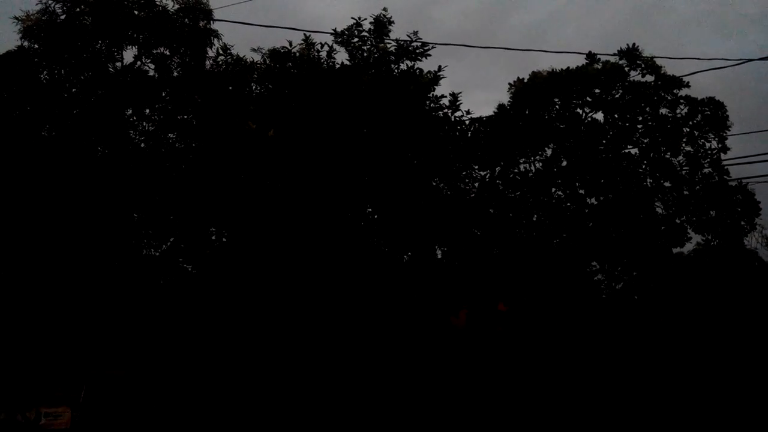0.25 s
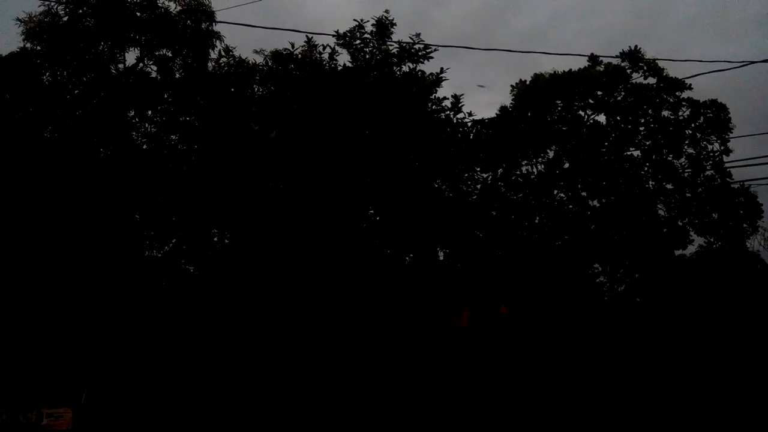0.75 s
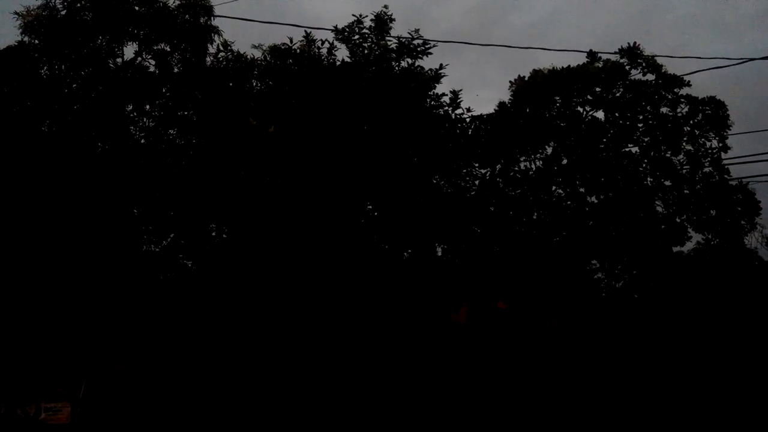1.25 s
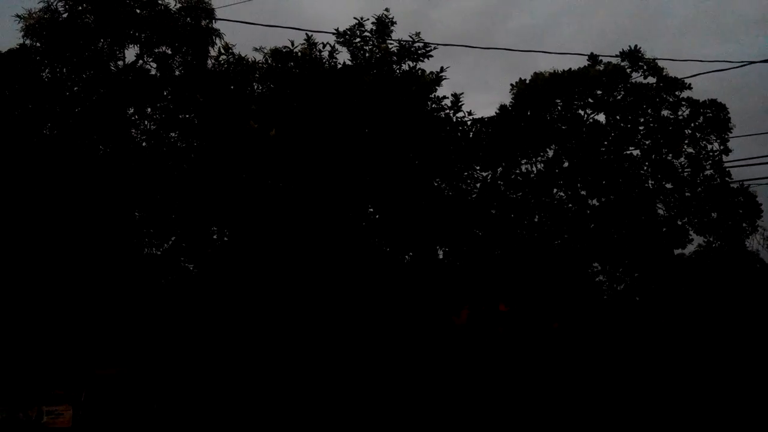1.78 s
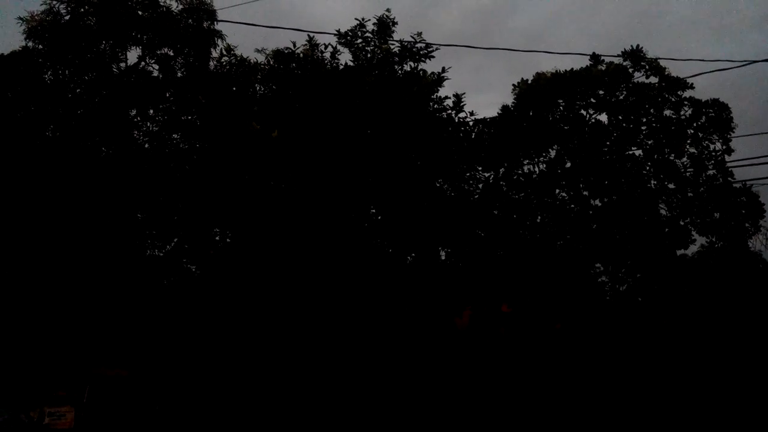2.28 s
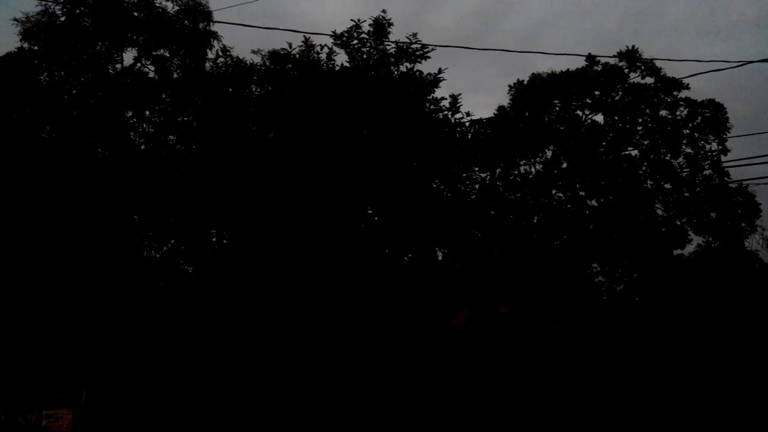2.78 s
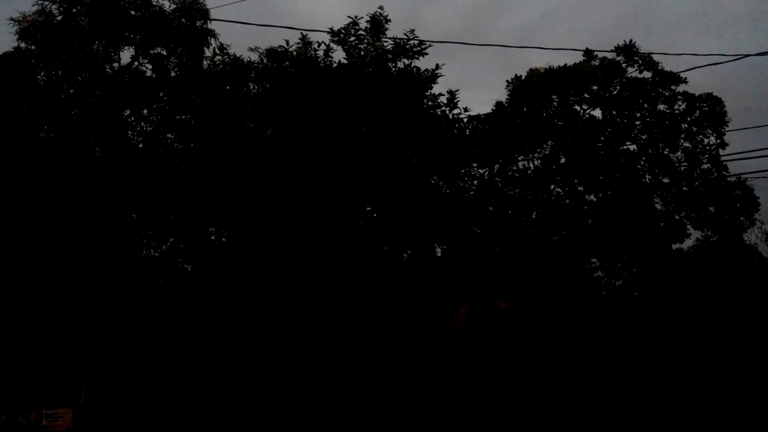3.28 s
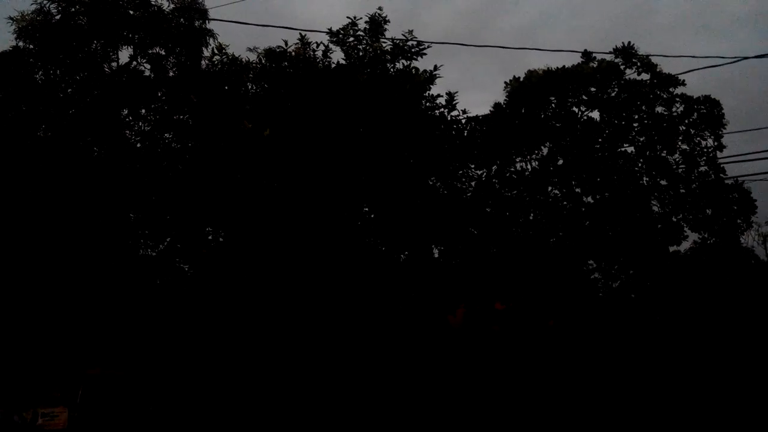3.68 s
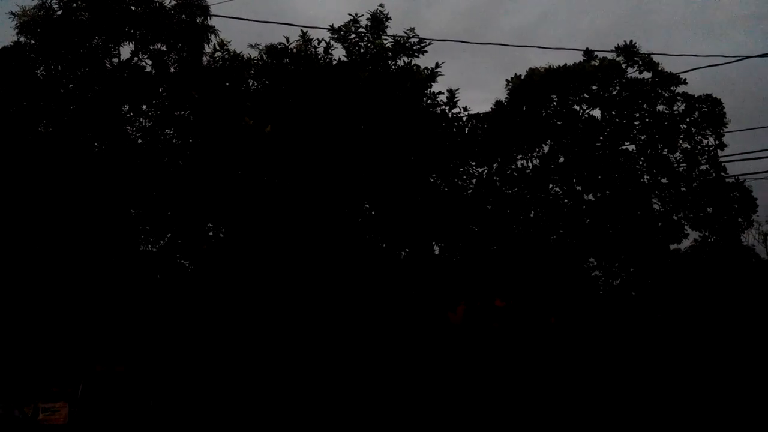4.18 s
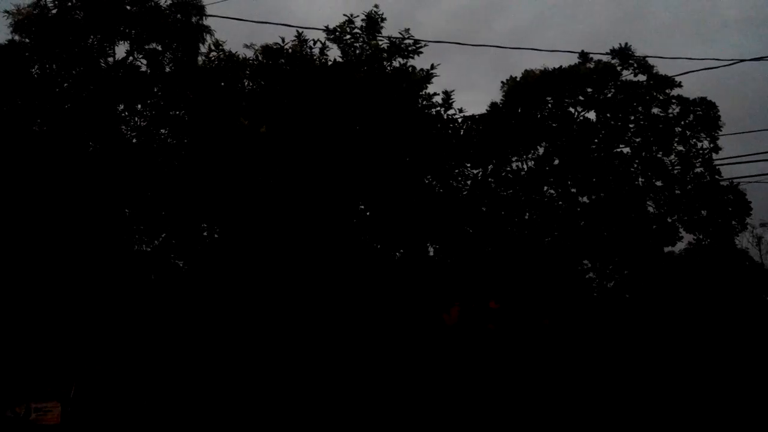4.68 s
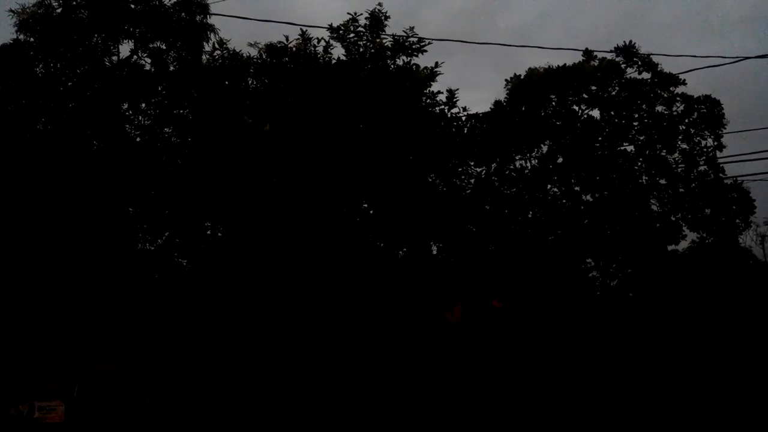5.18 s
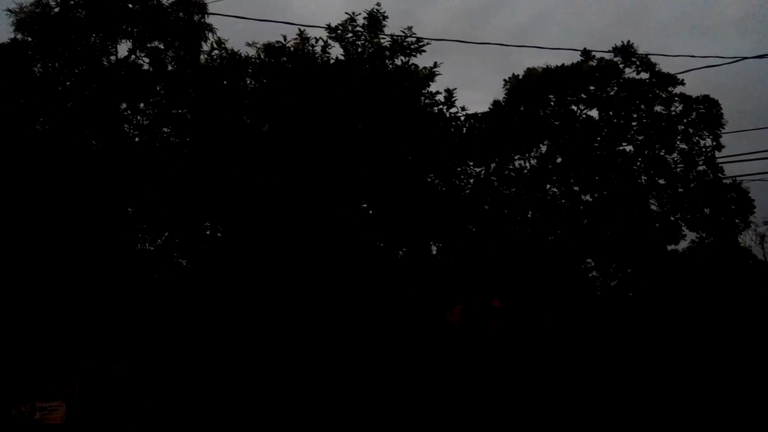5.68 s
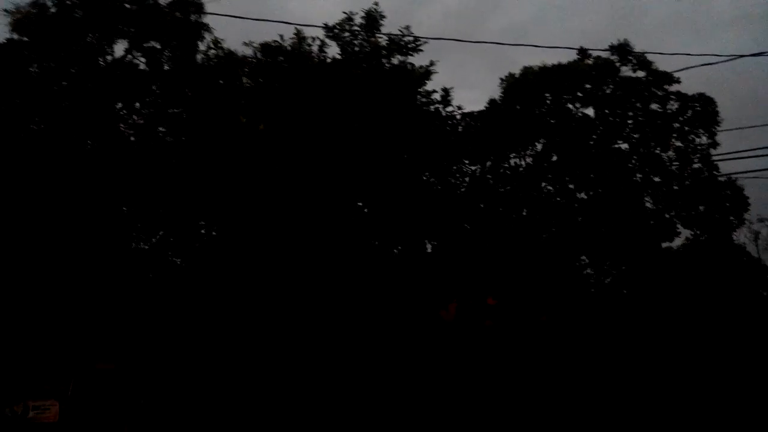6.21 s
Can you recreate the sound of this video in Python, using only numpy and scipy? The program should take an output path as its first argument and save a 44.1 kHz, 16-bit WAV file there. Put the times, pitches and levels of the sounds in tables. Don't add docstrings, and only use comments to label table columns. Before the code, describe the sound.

A dense flock is already chirping at 0 s and continues without pause to the cut at about 6.4 s. Hundreds of tiny, mostly falling calls blur into a bright, fluttering wash around 3 to 6 kHz, surging in short bouts with slight momentary dips. Nearer birds throw out sharp chirps of a few hundredths of a second, some falling, some rising, among softer calls and thin diving whistles. One very close bird gives an arched, buzzy-edged chirp to the right at about 1.0, 2.0 and, loudest, 4.8 s. Leaves and house fronts add short, scattered echoes. Underneath, low traffic rumble swells at times, most clearly from 3 to 3.9 s, over a steady soft town hum. Very faint vehicle whines pass at the start, around 1 s and after 5 s. A small stereo camera hears it outdoors, with treble cut above the birds.

```python
import sys
import numpy as np
from scipy import signal
from scipy.fft import rfft, irfft, next_fast_len
from scipy.io import wavfile
from scipy.ndimage import map_coordinates

SR = 44100
rng = np.random.default_rng(int(sys.argv[2]) if len(sys.argv) > 2 else 0)


def linear_from_db(decibels):
    return 10 ** (np.asarray(decibels, float) / 20)


def waveform_to_disk(signal):
    frames = np.transpose(np.atleast_2d(signal))
    scaled = np.clip(frames, -1, 1) * 32767
    samples = np.round(scaled).astype(np.int16)
    wavfile.write(sys.argv[1], SR, samples)


N = 284445

# pitch in Hz, likeness (-1 is opposite, 1 the same).
PORT_LIKENESS = [(60, 1), (250, 0.98), (500, 0.92), (900, 0.8), (1800, 0.8), (2900, 0.69), (4200, 0.14),
                 (5300, -0.21), (6500, -0.87), (7600, -0.57)]
# pitch in Hz, difference in dB.
PORT_LEAN = [(170, 0), (300, -0.1), (2500, -0.1), (4200, -1), (5700, -6), (6300, -12.5), (6900, -1),
             (7800, 3)]
# pitch in Hz, lead in radians.
PORT_LEAD = [(4700, -5.5), (5250, 1.5), (8000, 4)]

# pitch in Hz, level in dB per Hz.
CROWD_COLOUR = [(650, -61.5), (1100, -37), (1170, -27.5), (1470, -23), (1720, -17), (2840, -7),
                (3510, -1.5), (3930, -2), (4850, -9.5), (5850, -9), (6190, -9.5), (6500, -18),
                (7100, -29.5), (7640, -37), (9930, -42), (16800, -120)]
# middle in seconds, half length in seconds, top level in dB.
DEEP_BOUTS = [(.25, 0.24, -50), (.77, 0.22, -50.5), (1.55, 1, -53), (2.22, 0.13, -46), (2.45, 0.46, -51),
              (2.72, 0.18, -48), (3.2, 0.54, -53), (3.54, 0.024, -51), (3.8, 0.18, -73),
              (4.17, 0.035, -46.5), (4.45, 0.097, -51), (4.95, 0.37, -51.5), (5.6, 1, -54),
              (6.2, 0.47, -54.5), (6.45, 0.091, -60)]
MIDDLE_BOUTS = [(.05, 0.046, -27.5), (.27, 0.15, -28.5), (.49, 0.11, -28.5), (.73, 0.44, -33),
                (.9, 0.091, -33), (1.02, 0.029, -36), (1.27, 0.52, -33), (1.72, 0.78, -33.5),
                (2.06, 0.11, -30), (2.52, 0.42, -29), (2.91, 0.062, -31), (3.11, 0.042, -28.5),
                (3.34, 0.081, -27), (3.46, 0.099, -28.5), (3.81, 0.11, -31), (4.12, 0.53, -31),
                (4.76, 0.46, -29.5), (5.15, 0.27, -36), (5.35, 0.066, -32.5), (5.75, 0.23, -36.5),
                (6.14, 0.21, -57), (6.45, 0.13, -33)]
HIGH_BOUTS = [(.1, 0.33, -34), (.35, 0.21, -36.5), (.73, 0.1, -36.5), (.93, 0.74, -40.5),
              (1.07, 0.065, -32), (1.28, 0.14, -35.5), (1.7, 0.41, -38), (2.0, 0.14, -34.5),
              (2.52, 0.58, -36.5), (3.04, 0.81, -40.5), (3.39, 0.18, -35), (3.55, .08, -36),
              (3.75, 0.036, -35), (3.88, 0.083, -40), (4.12, 0.41, -40), (4.44, 0.038, -43.5),
              (4.62, 0.15, -38.5), (4.82, 0.32, -34), (5.19, 0.2, -38), (5.42, 0.17, -43.5),
              (5.73, 0.19, -39), (5.97, 0.058, -32.5), (6.13, 0.11, -35.5)]
DEEP_LULL_DB, MIDDLE_LULL_DB, HIGH_LULL_DB = -54.5, -35.5, -40.5
# middle in seconds, half length in seconds, change of level in dB.
HUSHES = [(0.648, 0.057, -3), (1.48, 0.019, 1), (3.674, 0.05, -3.5), (2.246, 0.016, -5.5),
          (3.169, 0.033, -0.5), (3.936, 0.03, -3), (4.371, 0.027, -5.5), (4.523, 0.036, -2.5),
          (5.056, 0.018, -0.5), (5.876, 0.14, -2), (6.302, 0.12, -2.5)]

# time in seconds, level in dB.
RUMBLE_LEVEL = [(0.0, -30.5), (0.02, -40.5), (1.18, -41.5), (1.33, -37.5), (1.6, -43), (1.89, -34.5),
                (1.96, -43.5), (3.0, -37), (3.07, -33), (3.27, -38), (3.32, -30), (3.61, -37),
                (3.65, -32.5), (3.79, -38.5), (3.83, -27.5), (3.86, -31), (4.63, -41), (6.45, -40.5)]
# pitch in Hz, level in dB per Hz.
RUMBLE_COLOUR = [(12, -44), (20, -46.5), (27, -24), (69, 1.5), (123, 7.5), (177, 1.5), (270, -32),
                 (330, -26.5), (430, -35.5), (730, -120)]
# pitch in Hz, level in dB per Hz.
HUM_COLOUR = [(120, -27), (200, -4), (365, -19.5), (562, -26.5), (647, -30.5), (919, -32.5), (1180, -35.5),
              (2200, -25.5), (2860, -30), (4840, -120)]
# time in seconds, level in dB.
HUM_LEVEL = [(0, -49.5), (1.2, -50.5), (2.2, -51), (4.4, -50.5), (5.2, -49.5), (6.45, -50.5)]
# time in seconds, pitch in Hz, level in dB, level of the octave above in dB.
WHINES = [
    [(0, 805, -65, -62), (.17, 789, -69, -62), (.24, 782, -78, -66), (.31, 775, -68, -64),
     (.48, 764, -69, -66), (.66, 755, -80, -78)],
    [(.88, 746, -82, -92), (.97, 745, -72, -88), (1.06, 744, -77, -90), (1.13, 743, -72, -88),
     (1.42, 745, -73, -88), (1.55, 745, -84, -92)],
    [(5.1, 1076, -82, -97), (5.13, 1076, -71, -90), (5.2, 1078, -80, -91)],
    [(5.68, 1081, -76, -93), (5.72, 1080, -67, -88), (6.05, 1077, -69, -90), (6.14, 1076, -82, -95)],
    [(6.15, 935, -82, -95), (6.24, 930, -71, -92), (6.34, 926, -82, -95)],
]

# start in seconds, length in seconds, start pitch in Hz, end pitch in Hz, level in dB.
SOFTER = [(0.188, .03, 6750, 6280, -24), (0.199, 0.027, 3150, 3000, -32), (.237, .04, 4250, 4010, -28.5),
          (0.288, .03, 5090, 4620, -30.5), (.462, .03, 7100, 6900, -39), (0.896, 0.038, 5200, 4980, -35),
          (0.961, 0.03, 6480, 6290, -28), (1.009, 0.017, 4700, 5010, -27),
          (1.042, 0.034, 2360, 2290, -47.5), (1.105, .027, 5800, 5560, -29.5),
          (1.153, .045, 7050, 6580, -32.5), (1.708, .03, 5320, 5450, -28),
          (1.709, 0.044, 3050, 2550, -33.5), (1.842, 0.033, 7080, 7000, -37),
          (1.987, 0.05, 5280, 4840, -26.5), (2.049, 0.027, 2046, 1920, -42), (2.372, .033, 2254, 2120, -42),
          (2.414, .03, 6500, 6400, -33), (2.505, 0.035, 4400, 4060, -28.5), (2.569, .028, 2890, 2820, -37),
          (2.635, .031, 3020, 2940, -34), (2.87, 0.025, 3810, 3630, -28.5), (3.31, .033, 4350, 4470, -31),
          (3.321, .027, 5880, 5630, -28.5), (3.53, .03, 6370, 6140, -37), (3.82, 0.031, 6170, 5970, -25.5),
          (3.957, .028, 5890, 5800, -27.5), (3.998, .027, 6700, 6400, -23), (4.693, 0.025, 6900, 6840, -35),
          (4.708, 0.034, 4430, 4180, -36.5), (4.76, 0.033, 5850, 5720, -27.5),
          (5.17, 0.028, 6020, 6030, -24), (5.379, 0.032, 6120, 5740, -25), (5.572, 0.051, 6320, 5880, -28),
          (5.707, 0.027, 3590, 3630, -32.5), (5.722, 0.033, 6500, 5830, -30)]
# start in seconds, length in seconds, start pitch in Hz, end pitch in Hz, level in dB.
CLEAR = [(0.029, .06, 7300, 5600, -36.5), (.42, 0.11, 4600, 2700, -39), (2.865, .07, 6700, 2900, -33.5),
         (3.994, .09, 4800, 2760, -35), (4.63, 0.066, 5000, 2500, -35), (4.738, 0.047, 6700, 5150, -25),
         (4.705, 0.032, 5000, 4100, -30.5), (2.4, 0.028, 6100, 4800, -26),
         (1.238, 0.062, 6550, 5300, -29.5), (5.7, 0.037, 6200, 3700, -33), (5.13, .055, 6850, 6400, -28),
         (5.95, 0.046, 6700, 4250, -33), (2.134, .022, 7500, 7100, -44), (2.55, .035, 7400, 7000, -45),
         (2.904, .026, 7350, 7360, -45), (3.71, 0.022, 7700, 7200, -42), (4.295, .03, 7800, 7800, -44),
         (4.404, .032, 7600, 7200, -37), (4.652, .02, 7900, 7800, -49), (5.32, 0.023, 7800, 7450, -42),
         (6.01, .04, 7300, 7660, -44), (6.125, .03, 7000, 6470, -42), (2.485, 0.066, 2600, 2300, -42),
         (3.6, .06, 3100, 2500, -41), (5.728, .16, 2010, 1995, -54.5), (.4, .025, 7400, 8400, -44),
         (6.29, 0.043, 6400, 4700, -35)]
SOFTER_LEAN, CLEAR_LEAN = 0.83, 0.3

# start in seconds, length in seconds, start pitch in Hz, level in dB.
PLUNGING = [(1.486, 0.012, 6430, -23.5), (1.678, 0.054, 6860, -24), (2.835, .04, 4050, -30),
            (2.888, .034, 5620, -41.5), (3.288, 0.066, 5590, -32), (3.334, 0.093, 6020, -46),
            (3.86, 0.032, 5300, -27), (4.579, 0.067, 6830, -28.5), (4.744, 0.031, 6540, -29.5),
            (5.576, .045, 6240, -29.5)]
FALLING = [(.229, 0.022, 5430, -31), (.283, 0.025, 5670, -35), (.417, 0.057, 4550, -35.5),
           (.692, 0.042, 5270, -27), (.737, 0.02, 6790, -20), (.887, 0.053, 5030, -31.5),
           (1.233, 0.13, 6470, -39), (1.64, 0.028, 4450, -41), (1.704, 0.025, 6050, -26.5),
           (2.424, 0.015, 6670, -34.5), (2.525, 0.092, 6900, -47), (2.555, 0.03, 6430, -26.5),
           (2.613, 0.071, 6140, -23), (2.88, 0.019, 6250, -37), (2.93, 0.031, 3010, -41),
           (3.027, 0.042, 5850, -27), (3.227, 0.034, 6625, -20.5), (3.327, 0.091, 3240, -39.5),
           (3.944, .06, 6230, -25), (4.017, 0.03, 4670, -29), (4.644, 0.037, 4100, -32),
           (4.853, 0.033, 3900, -24), (5.341, 0.018, 3340, -31.5), (5.962, 0.18, 4980, -38.5)]
SAGGING = [(.129, 0.036, 4330, -33.5), (.191, 0.074, 6930, -28), (.252, 0.025, 5910, -27),
           (.691, 0.024, 4540, -28), (.876, 0.035, 5930, -26), (1.005, 0.019, 4930, -28),
           (1.108, 0.021, 4330, -26.5), (1.833, 0.022, 3640, -28.5), (2.21, 0.067, 2670, -39.5),
           (2.438, 0.036, 5570, -29.5), (2.5, 0.035, 3830, -28.5), (2.64, 0.069, 3030, -43),
           (2.725, 0.051, 4140, -28), (2.992, 0.072, 6500, -26.5), (3.11, 0.045, 4180, -28.5),
           (3.409, 0.023, 4290, -27.5), (3.51, 0.043, 5920, -26.5), (4.013, 0.044, 5960, -26.5),
           (4.063, 0.025, 3305, -30), (4.789, 0.022, 3770, -22), (4.926, 0.069, 4700, -34),
           (5.5, 0.038, 3340, -39.5), (6.02, 0.052, 2520, -44.5), (6.4, 0.041, 2850, -42.5)]
RISING = [(.166, 0.092, 5600, -23), (.433, 0.016, 3340, -40.5), (.712, 0.024, 5810, -25.5),
          (.857, 0.033, 3395, -29.5), (.898, 0.031, 3320, -31), (1.266, 0.013, 5480, -21),
          (1.748, 0.021, 3440, -29.5), (1.921, 0.035, 4900, -27.5), (2.213, 0.02, 3700, -32.5),
          (2.344, 0.028, 6000, -23), (2.491, 0.024, 6070, -26.5), (2.506, 0.026, 5430, -24.5),
          (2.61, 0.015, 3790, -30), (2.638, 0.032, 5500, -33), (2.7, 0.028, 2590, -30.5),
          (3.818, 0.01, 5920, -24), (4.053, 0.082, 5480, -38), (4.212, 0.034, 4150, -30),
          (4.313, 0.03, 3900, -31.5), (4.575, 0.026, 4380, -26), (5.168, 0.19, 5820, -44.5),
          (5.833, 0.025, 3650, -31), (5.95, 0.19, 5380, -34.5), (6.255, 0.03, 2460, -39)]
HELD = [(.24, 0.048, 2146, -49.5), (2.48, 0.063, 2674, -41), (4.84, 0.028, 1856, -47.5),
        (5.24, 0.051, 2460, -49), (5.3, 0.12, 2450, -48), (6.11, 0.091, 1830, -53)]
PLUNGE, FALL, SAG, RISE, HOLD = 0.74, 0.91, 0.93, 1.04, 0.985
LEAN_GROWS = 0.94
PERCH_DB = 5.5
# start in seconds, length in seconds,
# top pitch in Hz, end pitch in Hz, level in dB, left over right in dB.
NEAREST = [
    (1.036, 0.051, 6480, 5150, -15, -12.5),
    (1.956, 0.052, 6300, 5200, -14, -9),
    (4.785, 0.037, 6750, 5450, -11.5, -9),
]
BEAT_HZ, BEAT_DEPTH = 250, 0.4


def unit(x):
    mean = np.mean(np.atleast_2d(x), 0)
    return x / np.sqrt(np.mean(mean ** 2) + 1e-20)


def along(points, hz):
    f, v = np.transpose(points)
    return np.interp(np.log(hz + 1), np.log(f + 1), v)


def curves(rows):
    s, *columns = np.transpose(rows)
    return [np.interp(np.arange(N) / SR, s, column) for column in columns]


def filtered(x, response):
    m = next_fast_len(N + SR // 2)
    hz = np.fft.rfftfreq(m, 1 / SR)
    return irfft(rfft(x, m) * response(hz), m)[..., :N]


def ports(pair, spectrum):
    def response(hz):
        turn = np.arccos(np.clip(along(PORT_LIKENESS, hz), -.99, .999)) / 2
        left, right = linear_from_db(along(PORT_LEAN, hz) / 2), linear_from_db(-along(PORT_LEAN, hz) / 2)
        same, other = np.cos(turn), np.sin(turn)
        mean = np.hypot((left + right) * same, (left - right) * other)
        mix = np.array([[left * same, left * other], [right * same, -right * other]])
        return linear_from_db(along(spectrum, hz)) / mean * mix
    return filtered(pair, response).sum(1)


def port_turn(hz):
    return np.exp(1j * along(PORT_LEAD, hz) * np.array([[1], [0]]))


def panned(rows, extra_db):
    level, lean = linear_from_db(rows[:, 4] + extra_db), linear_from_db(rows[:, 5] / 2)
    both = np.sqrt((lean ** 2 + lean ** -2) / 2)
    return [level * lean / both, level / lean / both]


def sing(rows, rough, gains, scoop=0.0594, scoop_s=0.00565, throb=8, beat=0):
    s, length, start_hz, end_hz = rows.T[:4, :, None]
    t = np.arange(int(length.max() * SR) + 1) / SR
    u = np.clip(t / length, 0, 1)
    knots = rng.standard_normal((len(rows), 2, 48)).transpose(1, 0, 2)
    joined = np.clip(1 - abs(t / .002 - np.arange(48)[:, None]), 0, 1)
    pitch, strength = knots @ joined
    hz = (start_hz + (end_hz - start_hz) * u ** 1.5) * (1 + 0.0462 * rough * pitch)
    hz = hz * (1 - scoop * np.exp(-t / scoop_s))
    swell = np.sin(np.pi * u) ** .6
    wave = np.sin(2 * np.pi * np.cumsum(hz, 1) / SR) * swell * linear_from_db(throb * rough * strength)
    beat_turn = 2 * np.pi * np.cumsum(BEAT_HZ * (1 + .5 * strength), 1) / SR
    wave = wave * (1 + beat * np.cos(beat_turn))
    at = (np.round(s * SR).astype(int) + np.arange(len(t))).ravel()
    return np.array([np.bincount(at, (wave * g[:, None]).ravel(), N + SR)[:N] for g in gains])


def trees(x, t60, gap):
    t = np.arange(SR // 3) / SR
    out = np.zeros((len(x), N + SR))
    piece = 35280
    for k in range(0, N, piece):
        tail = rng.standard_normal((len(x), len(t))) * linear_from_db(-60 * t / t60) * (t > gap)
        tail /= np.linalg.norm(tail, axis=1, keepdims=True)
        wet = signal.fftconvolve(x[:, k:k + piece], tail, axes=1)
        out[:, k:k + wet.shape[1]] += wet
    return out[:, :N]


def humps(middle, half, t):
    return np.cos(np.pi / 2 * np.clip((t - middle) / half, -1, 1)) ** 2


def bouts(table, lull_db):
    s, half, db = np.transpose(table)[:, :, None]
    t = np.arange(0, N + 64, 64) / SR
    power = linear_from_db(2 * lull_db) + (linear_from_db(2 * db) * humps(s, half, t) ** 2).sum(0)
    return np.interp(np.arange(N) / SR, t, np.sqrt(power))


def hush():
    s, half, db = np.transpose(HUSHES)[:, :, None]
    t = np.arange(0, N + 64, 64) / SR
    dip_db = (db * humps(s, half, t)).sum(0)
    return np.interp(np.arange(N) / SR, t, linear_from_db(dip_db))


def crowd(count=2600):
    when, size, pitch, fall, loud, side = rng.random((count, 6)).T
    middle_hz = 1600 + 7400 * pitch
    slide_hz = middle_hz * (.42 * fall - .03)
    start_hz, end_hz = middle_hz + slide_hz / 2, middle_hz - slide_hz / 2
    rows = np.transpose([when * N / SR, .018 + .022 * size, start_hz, end_hz])
    level = linear_from_db(-.8 * np.log(1 - loud))
    dry = sing(rows, rough=.7, gains=[level * np.cos(np.pi * side), level * np.sin(np.pi * side)])
    wet = linear_from_db(-2) * dry + trees(dry, t60=.12, gap=.002)
    wet = wet / wet.std() + linear_from_db(6.5) * rng.standard_normal((2, N))
    field = hush() * ports(wet, CROWD_COLOUR)

    def above(hz, edge_hz):
        return 1 / (1 + (edge_hz / (hz + 1)) ** 8)
    deep = filtered(field, lambda hz: 1 - above(hz, 2957))
    high = filtered(field, lambda hz: above(hz, 4980))
    middle = field - deep - high
    return (bouts(DEEP_BOUTS, DEEP_LULL_DB) * unit(deep)
            + bouts(HIGH_BOUTS, HIGH_LULL_DB) * unit(high)
            + linear_from_db(-8.5) * bouts(MIDDLE_BOUTS, MIDDLE_LULL_DB) * unit(middle))


def traffic():
    rumble = unit(ports(rng.standard_normal((2, N)), RUMBLE_COLOUR))
    hum = unit(ports(rng.standard_normal((2, N)), HUM_COLOUR))
    return linear_from_db(curves(RUMBLE_LEVEL)[0]) * rumble + linear_from_db(curves(HUM_LEVEL)[0]) * hum


def whines():
    out, t = np.zeros(N), np.arange(N) / SR
    for rows in WHINES:
        hz, db, octave_db = curves(rows)
        drift, fade = (map_coordinates(knots, [t * 25]) for knots in rng.standard_normal((2, 180)))
        turn = 2 * np.pi * np.cumsum(hz * (1 + .003 * drift)) / SR
        tone = linear_from_db(db) * np.sin(turn) + linear_from_db(octave_db) * np.sin(2 * turn)
        heard = (t >= rows[0][0]) * (t < rows[-1][0])
        out += tone * linear_from_db(1.1 * fade) * heard
    return np.sqrt(2) * out


def leaning(rows, share):
    return np.column_stack([rows, share * along(PORT_LEAN, rows[:, 2:4].mean(1))])


def softer_birds():
    soft, clear = leaning(np.array(SOFTER), SOFTER_LEAN), leaning(np.array(CLEAR), CLEAR_LEAN)
    dry = sing(soft, .45, panned(soft, extra_db=-1.5))
    dry = dry + sing(clear, .15, panned(clear, extra_db=0))
    direct = filtered(dry, port_turn)
    return linear_from_db(-2.5) * direct + linear_from_db(-8) * trees(dry, t60=.12, gap=.002)


def calls(table, slide):
    s, length, hz, db = np.transpose(table)
    lean_db = LEAN_GROWS * along(PORT_LEAN, hz * np.sqrt(slide))
    lean_db = lean_db + PERCH_DB * rng.standard_normal(len(s))
    return np.transpose([s, length, hz, hz * slide, db, lean_db])


def near_birds():
    kinds = [(PLUNGING, PLUNGE), (FALLING, FALL), (SAGGING, SAG), (RISING, RISE)]
    sliding = np.vstack([calls(*kind) for kind in kinds])
    held, nearest = calls(HELD, HOLD), np.array(NEAREST)
    dry = sing(sliding, .55, panned(sliding, extra_db=-1.0))
    dry = dry + sing(nearest, .21, panned(nearest, extra_db=-0.5),
                     scoop=.13, scoop_s=.008, throb=12, beat=BEAT_DEPTH)
    dry = dry + sing(held, .08, panned(held, extra_db=0), scoop=0)
    dry = filtered(dry, lambda hz: 1 / (1 + (1500 / (hz + 1)) ** 8))

    def house_front(hz):
        return 1 + linear_from_db(-8) * np.exp(-2j * np.pi * hz * .022)
    direct = filtered(dry, lambda hz: port_turn(hz) * house_front(hz))
    leaves = trees(dry, t60=.1, gap=.002)
    walls = trees(dry, t60=.35, gap=.03)
    return linear_from_db(-2.5) * direct + linear_from_db(-7) * leaves + linear_from_db(-14) * walls


def scene():
    return crowd() + traffic() + whines() + softer_birds() + near_birds()


def band_limit(x):
    return signal.sosfilt(signal.butter(12, 8900, fs=SR, output="sos"), x)


def record(dry):
    mix = filtered(dry, lambda hz: 1 / np.sqrt(1 + (hz / 7400) ** 16)) - .001
    return band_limit(mix)


dry = scene()
out = record(dry)
waveform_to_disk(out)
```